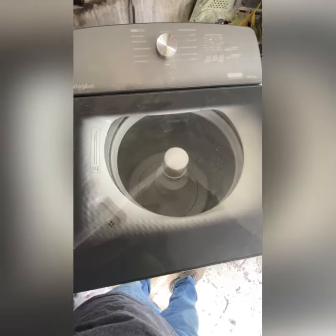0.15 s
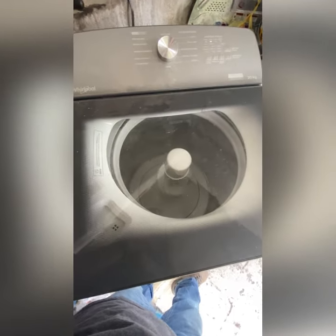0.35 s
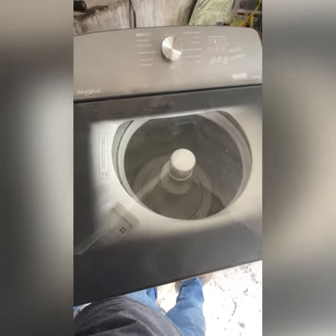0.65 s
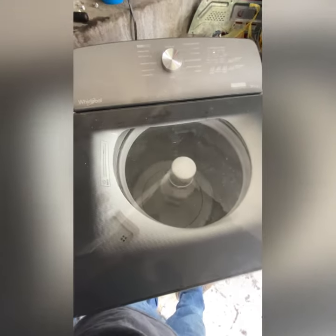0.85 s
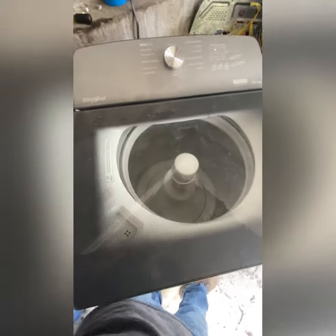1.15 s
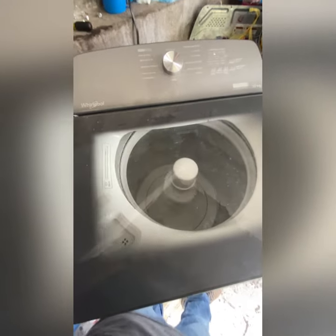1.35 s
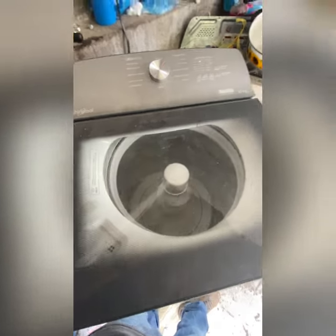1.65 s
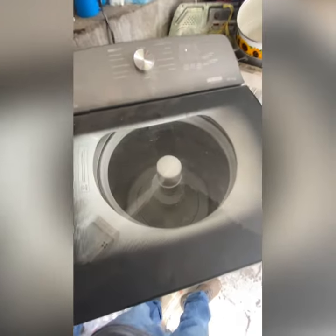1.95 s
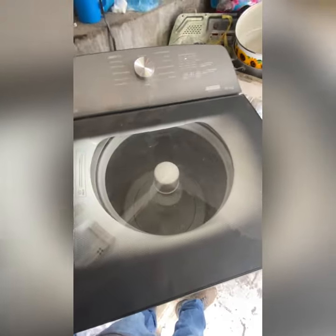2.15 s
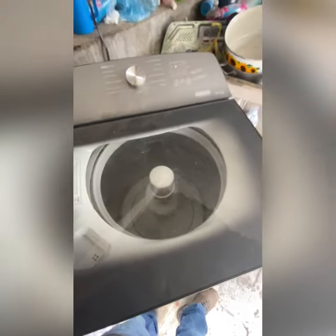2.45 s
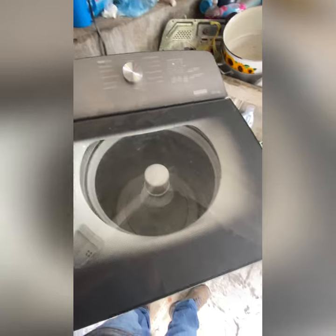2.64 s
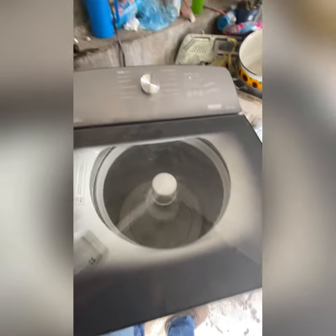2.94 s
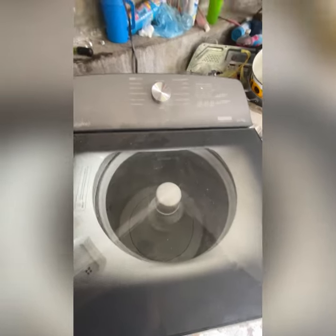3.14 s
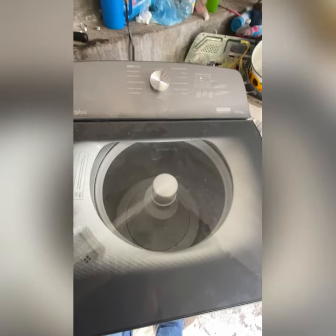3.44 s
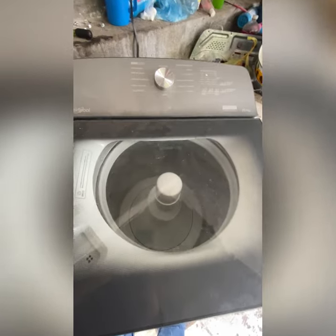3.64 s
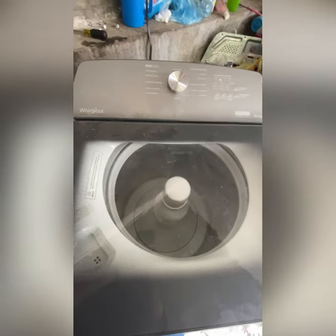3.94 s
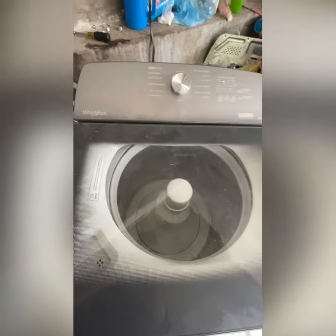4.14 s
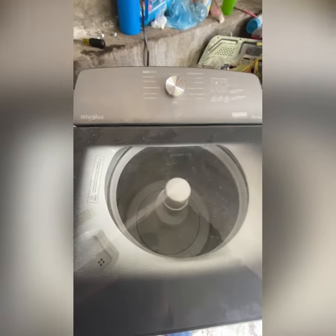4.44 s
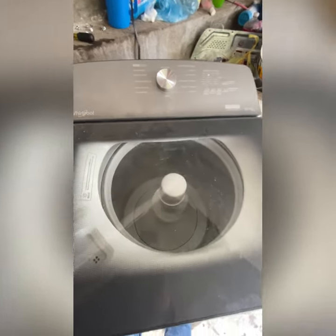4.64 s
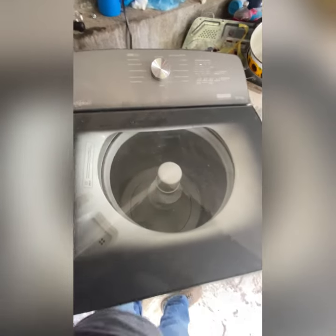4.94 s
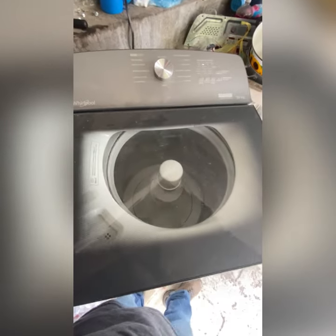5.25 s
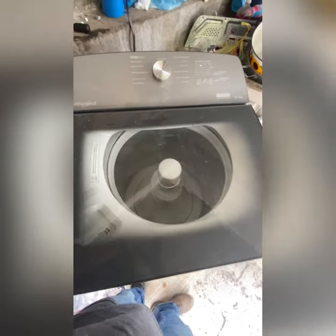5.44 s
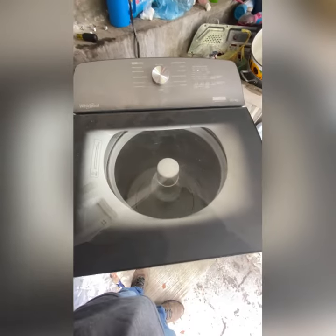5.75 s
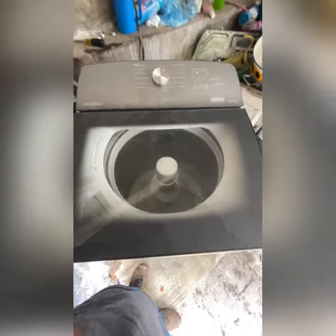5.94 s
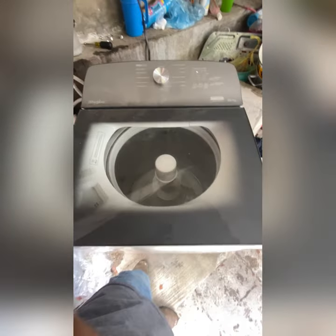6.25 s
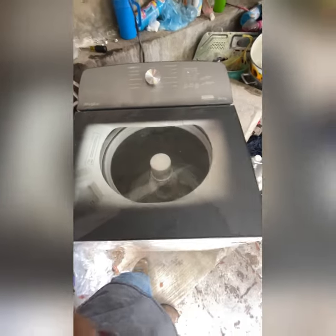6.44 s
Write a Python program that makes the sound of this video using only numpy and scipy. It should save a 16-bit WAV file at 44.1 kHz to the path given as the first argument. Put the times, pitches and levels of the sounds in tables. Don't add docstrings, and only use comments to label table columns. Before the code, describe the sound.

An empty washing machine spins down outdoors. At first motor hum and belt whirr sit over a heavy rumble, with one bright drop tick; then a short rattling thud ends the motor. The low shaking gradually sinks in pitch and level, the panel throbs, and leftover water spits and splashes. Far engines swell faintly. Close stereo pickup, dry open air.

```python
import sys
import numpy as np
from scipy import signal
from scipy.fft import rfft, irfft, next_fast_len
from scipy.io import wavfile

SR = 44100
rng = np.random.default_rng(int(sys.argv[2]) if len(sys.argv) > 2 else 0)


def rack_gain(trim_db):
    fader = np.asarray(trim_db, float)
    return 10 ** (fader / 20)


def wrap_up_sound(samples):
    columns = np.atleast_2d(samples).T
    tamed = np.clip(columns, -1, 1)
    steps = np.round(tamed * 32767).astype(np.int16)
    wavfile.write(sys.argv[1], SR, steps)


N = 290619
T = np.arange(N) / SR
MOTOR_OFF_S = 0.90


def rms_one(x):
    return x / np.sqrt(np.mean(x ** 2) + 1e-20)


def at_hz(points, hz):
    point_hz, value = np.transpose(points)
    return np.interp(np.log(hz + 1), np.log(point_hz + 1), value)


def drift(rate_hz):
    r = np.exp(-2 * np.pi * rate_hz * 64 / SR)
    slow = signal.lfilter([1], [1, -2 * r, r * r], rng.standard_normal(N // 64 + 2002))[2000:]
    return np.interp(np.arange(N) / 64, np.arange(len(slow)), rms_one(slow - slow.mean()))


def sine(hz, level_db):
    turns = np.cumsum(hz + np.zeros(N)) / SR
    return np.sqrt(2) * rack_gain(level_db) * np.sin(2 * np.pi * (turns + rng.random()))


def swell(peak_s, half_s):
    return np.exp(-0.5 * ((T - peak_s) / half_s) ** 2)


def ring(clicks, hz, t60_s):
    r, w = rack_gain(-60 / (t60_s * SR)), 2 * np.pi * hz / SR
    return signal.lfilter([0, np.sin(w)], [1, -2 * r * np.cos(w), r * r], clicks + 1e-18)


def noise(spectrum):
    size = next_fast_len(N)
    colour = rack_gain(at_hz(spectrum, np.arange(size // 2 + 1) * SR / size))
    return rms_one(irfft(rfft(rng.standard_normal((2, size))) * colour, size)[:, :N])


def rumble():
    # freq_hz, level_db_per_hz
    low = [(15, -51), (28, -24), (42, -10), (75, 0.5), (125, -6.5), (190, -17.5), (240, -9), (400, -13.5),
           (470, -20), (560, -19.5), (800, -22)]
    # freq_hz, level_db_per_hz
    air = [(800, -24), (1050, -28), (1500, -31.5), (2250, -33.5), (2480, -33.5), (2700, -36), (3900, -43.5),
           (4700, -45), (6000, -48.5), (6700, -52), (8000, -56.5), (10000, -61), (12000, -65),
           (15000, -76.5), (17000, -120)]
    driven_db, settle_s = 2.5, 1
    level_db = -37 - 0.6 * T + driven_db * np.exp(-T / settle_s)
    return rack_gain(level_db + drift(17.0)) * noise([*low, *air[1:]])


def tub():
    # time_s, turns_per_s
    tub_turns = [(0, 13.12), (6.59, 10.06)]
    # freq_hz, level_db
    cabinet = [(20, -56), (36, -77), (48, -62), (70, -46.5), (105, -56), (135, -52), (160, -67.5),
               (190, -65), (240, -63), (330, -65.5), (420, -49)]
    # freq_hz, width_hz, level_db
    swept = [(31.8, 2.2, -53), (54.24, 1.64, -37), (57.8, 0.79, -38), (60.55, 1.9, -27.5),
             (63.3, 2.2, -37.5), (64.67, 0.75, -29.5), (73.7, 8.4, -42), (78, 2.2, -36.5), (82.1, 2.3, -37),
             (87.14, 3.3, -37.5), (105.3, 9.5, -50.5), (121.8, 3, -52), (130.45, 6.4, -48), (147.3, 5, -51)]
    strong = dict([(3, -1.5), (5, -1), (7, -1), (9, 2.5), (10, -2.5), (11, 3), (12, -1), (13, -5.5)])
    # peak_s, half_s, level_db
    bouts = [
        (1.007, 0.12, -43),
        (1.895, 0.28, -42.5),
        (2.917, 0.34, -40),
        (4.612, 0.35, -48),
        (5.346, 0.3, -46),
        (6.1, 0.27, -45.5),
    ]
    panel_hz, panel_width_hz = 282, 14.3
    knock_turn = 0.13

    speed = np.interp(T, *np.transpose(tub_turns))
    angle = 2 * np.pi * np.cumsum(speed) / SR
    coarse, lines = slice(0, N, 16), 0
    for order in range(2, 32):
        hz = order * speed[coarse]
        if order in strong:
            power = 0
            for mode_hz, width_hz, top_db in swept:
                power = power + rack_gain(2 * top_db) / (1 + (2 * (hz - mode_hz) / width_hz) ** 2) ** 2
            gain = rack_gain(strong[order]) * np.sqrt(power)
        else:
            gain = rack_gain(at_hz(cabinet, hz))
        spread_db = 2.2 if order > 7 or order not in strong else 0.6
        waver = rack_gain(spread_db * drift(1.0)[coarse])
        phase = order * angle[coarse] + 2 * np.pi * rng.random()
        lines = lines + np.sqrt(2) * gain * waver * np.sin(phase)
    shaking = signal.resample_poly(lines, 16, 1, padtype="reflect")[:N]

    knock_angle = angle + 2 * np.pi * (knock_turn + 0.051 * drift(1))
    throb = rack_gain(11.0 * np.cos(knock_angle) + 2.0 * drift(4.3))
    panel = throb * sine(panel_hz + 0.302 * panel_width_hz * drift(1.875), 0)
    bout_gain = sum(rack_gain(level_db) * swell(s, half_s) for s, half_s, level_db in bouts)
    return shaking + bout_gain * rms_one(panel)


def sheet():
    # freq_hz, rms_db, t60_s
    sheet_modes = [(357.4, -50, 0.15), (422, -51.5, 0.099), (543.6, -51.5, 0.07), (707, -59, 0.04)]
    jolts_per_s = 150.0
    out = np.zeros((2, N))
    for hz, level_db, t60_s in sheet_modes:
        struck = rng.random((2, N)) < jolts_per_s / SR
        force = rack_gain(4.1 * np.minimum(rng.exponential(1, (2, N)), 4))
        jolts = struck * force * rng.choice([-1, 1], (2, N))
        out += rack_gain(level_db) * rms_one(ring(ring(jolts, hz, t60_s), hz, 0.28 * t60_s))
    return out * rack_gain(-0.6 * T)


def motor():
    # multiple_of_hum, level_db
    hum_lines = [(1, -44), (2, -41), (3, -42), (3.62, -51), (6.01, -45), (7.02, -61), (9, -66),
                 (14.17, -70), (17.05, -75)]
    # freq_hz, level_db_per_hz
    whirr_colour = [(120, -47), (200, -11), (290, 5.5), (400, -10), (440, -1), (480, -4.5), (600, -6),
                    (800, -8.5), (1100, -23.5), (2100, -27), (2500, -30), (4000, -49), (6000, -56)]
    hum_hz = 121.1
    since_s = T - MOTOR_OFF_S
    easing = np.clip(since_s + 0.09, 0, 1)
    hum = 0
    for k, level_db in hum_lines:
        hum = hum + sine(k * hum_hz, level_db + min(0.3 * k, 1.2) * drift(8) - 9 * k * easing)
    whirr = rack_gain(-41.0 + 0.94 * drift(20)) * noise(whirr_colour)
    return (whirr + hum * [[1], [0.5]]) * rack_gain(-300.0 * np.clip(since_s, 0, 1))


def wet_spray():
    # freq_hz, level_db_per_hz
    spray_colour = [(600, -8), (1300, -0.5), (2000, 4), (2600, 7), (4000, -2.5), (4800, -1), (5200, -0.5),
                    (5800, -3), (7000, -5), (8000, -11.5), (10000, -16), (12000, -20), (15000, -28.5),
                    (17000, -71)]
    return noise(spray_colour) * rack_gain(0.51 * drift(73))


def spits(spray):
    # start_s, level_db, brightness_db
    fine = [(0.0, -52, -5), (.12, -58, 6), (.256, -54.5, 4), (0.322, -49.5, 5.5), (.52, -66, -12),
            (.645, -57.5, -6), (.79, -64, 14), (1.0, -57.5, -4), (1.1, -65, -3), (1.188, -55.5, 7),
            (1.27, -67, 2), (1.55, -58, -4), (1.62, -58.5, -2), (1.806, -56, -2), (2.007, -58, 10),
            (2.268, -49.5, 10), (2.69, -65, -12), (2.97, -66, 9), (3.275, -60, 6), (3.34, -62, 6),
            (3.58, -63, 7), (3.68, -60, 6), (4.488, -55.5, 13), (4.725, -58, 1), (5.27, -73, 16),
            (5.53, -53.5, 3), (5.68, -78, 8), (5.89, -73, 13), (6.283, -70, 12), (2.14, -69, 12)]
    # start_s, level_db, hollow_hz, ring_db, t60_s
    splashes = [(.76, -63, 2440, 23, .2), (2.005, -60.5, 4700, 20, .2), (2.005, -71, 5700, 17, .2),
                (2.008, -67, 2440, 24, 0.45), (2.274, -55.5, 5600, 22, 0.21), (3.29, -63, 6030, 9, 0.48),
                (3.77, -59.5, 1590, 16, .26), (4.08, -69, 5470, 2, .4), (4.49, -52, 1470, 18, 0.21),
                (4.495, -62, 1780, 25, 0.17), (4.515, -71, 5770, 12, .24), (4.762, -57, 6150, -5, 0.26),
                (5.558, -51.5, 4550, 15, 0.17), (5.585, -75, 4900, 17, .13), (5.83, -61.5, 5470, 0, 0.48),
                (6.22, -66.5, 5500, 7, 0.51)]
    mist_hz, mist_t60_s, bright_shortens = 9700, 0.39, 0.46
    rise_ref_s, weak_slows, ring_quickens = 0.014, 0.55, 0.45
    mist = []
    for s, level_db, ring_db in fine:
        mist.append((s, level_db, mist_hz, ring_db, mist_t60_s * rack_gain(-bright_shortens * ring_db)))
    out = np.zeros((2, N))
    for s, level_db, hz, ring_db, t60_s in [*mist, *splashes]:
        rise_s = rise_ref_s * rack_gain(-weak_slows * (level_db + 66) - ring_quickens * max(ring_db - 8, 0))
        since_s = np.arange(int((rise_s + t60_s) * SR)) / SR
        decay_db = 60 * np.maximum(since_s - rise_s, 0) / t60_s
        shape = np.minimum(since_s / rise_s, 1) * rack_gain(level_db - decay_db)
        span = slice(int(s * SR), min(int(s * SR) + len(since_s), N))
        q = max(2, rack_gain(1.2 * ring_db))
        hollow = signal.lfilter(*signal.iirpeak(hz, q, fs=SR), spray[:, span])
        splash = rack_gain(-0.3 * ring_db) * spray[:, span] + rack_gain(ring_db) * hollow
        out[:, span] += shape[:span.stop - span.start] * splash
    return out


def engines():
    # start_s, stop_s, idle_s, idle_to_revs_s (negative: dropping), level_db
    spells = [
        (-.15, 1.45, .4, 2.7, -30),
        (1.25, 1.95, .4, 2.7, -34),
        (3.38, 4.08, 3.9, .5, -31.5),
        (3.92, 4.38, 3.9, .5, -32.5),
        (5.2, 5.9, 6.3, -1.2, -34),
        (5.72, 6.75, 6.3, -1.2, -33.5),
    ]
    idle_hz, idle_sag_hz_per_s, rev_hz, swell_power = 51.95, 0.2, 16.5, 0.84
    second_s, second_hz, second_db = 6.05, 94.7, -40
    out = np.zeros(N)
    for start_s, stop_s, idle_s, swing_s, level_db in spells:
        revs = 0.5 - 0.5 * np.cos(np.pi * np.clip((T - idle_s) / swing_s, 0, 1))
        hz = idle_hz - idle_sag_hz_per_s * idle_s + rev_hz * revs
        part = np.clip((T - start_s) / (stop_s - start_s), 0, 1)
        heard = np.abs(np.sin(np.pi * part)) ** swell_power
        out += heard * sine(hz + 0.35 * drift(4.3), level_db + 1.2 * drift(3))
    second = sine(second_hz + 1.1 * drift(3.8), second_db + 0.73 * drift(1.5))
    return out + np.clip((T - second_s) / 0.16, 0, 1) * second


def drops():
    # start_s, peak_db, pitch_hz
    ticks = [
        (.309, -28.5, 4840),
        (4.764, -48, 2200),
        (5.045, -48, 2000),
        (6.29, -58, 7910),
    ]
    out = np.zeros((2, N))
    for s, peak_db, hz in ticks:
        click = np.zeros(N)
        click[int(s * SR)] = rack_gain(peak_db)
        out[0] += ring(click, hz, 0.0012)
    return out


def clunk():
    # freq_hz, level_db_per_hz
    thud_colour = [(200, -32), (330, -5), (450, 6), (600, 0.5), (800, -6.5), (1000, -8.5), (1500, -18),
                   (2100, -20), (3200, -25), (5500, -32.5), (9000, -54)]
    # freq_hz, level_db, t60_s
    clutch = [(1240, -68, 0.043), (1410, -48.5, .06), (1570, -52, .12), (1790, -50, 0.051),
              (2830, -48, 0.04)]
    since_s = T - MOTOR_OFF_S
    fall_db = 280.0 * np.clip(since_s - 0.014, 0, 1)
    thud = np.clip((since_s + 0.017) / 0.0066, 0, 1) * rack_gain(-fall_db + 2.06 * drift(80))
    rattle = thud * rng.standard_normal((2, N))
    housing = sum(rack_gain(level_db - 24.0) * ring(rattle, hz, t60_s) for hz, level_db, t60_s in clutch)
    return rack_gain(-34.5) * thud * noise(thud_colour) + housing


def gush(spray):
    # freq_hz, level_over_spray_db
    gaps = [(2720, 3), (4725, 6), (4930, 9), (5593, 7), (5680, 6)]
    start_s, rise_s, hold_s, end_s = 2.292, 0.053, 0.055, 2.84
    level_db, rise_db, fall_db_per_s = -40.5, 17, 68.5
    bright_db, dulls_db_per_s, gap_width_hz = 10, 23, 25
    high = signal.sosfilt(signal.butter(2, 4000, "high", fs=SR, output="sos"), spray)
    jets = 0
    for hz, over_db in gaps:
        jets = jets + rack_gain(over_db) * signal.lfilter(*signal.iirpeak(hz, hz / gap_width_hz, fs=SR), spray)
    falling_s = np.maximum(T - start_s - rise_s - hold_s, 0)
    missing_db = rise_db * np.clip(1 - (T - start_s) / rise_s, 0, 1)
    gain = rack_gain(level_db - missing_db - fall_db_per_s * falling_s)
    gate = (T > start_s) * np.clip((end_s - T) / 0.18, 0, 1)
    bright = rack_gain(bright_db - dulls_db_per_s * falling_s)
    return gate * gain * (spray + (bright - 1) * high + jets)


def bearing():
    return swell(4.1, 0.3) * sine(2460 + 12 * drift(15), -71 + 4.0 * drift(12))


def insect():
    throbs_per_s, throb_db, beat_s = 10, 1, 5.4
    pulse_db = throb_db * np.cos(2 * np.pi * throbs_per_s * (T - beat_s))
    return swell(5.06, 0.11) * sine(6700 + 22 * drift(13.3), -67.5 + pulse_db + 4.1 * drift(30))


def ports(sound):
    # freq_hz, share_0_to_1
    shared_points = [(60, 1.0), (200, .985), (300, .94), (420, .8), (540, .55), (650, .16), (900, .3),
                     (1650, .45), (2000, .3), (3000, .45), (4200, .45), (5500, .75), (9500, .78),
                     (10000, .97)]
    # freq_hz, lead_rad
    lead = [(40, 0), (300, -.15), (550, .1), (850, 2.4), (1500, .4), (2800, 2.4), (3900, 1.1), (4500, 2.0),
            (5500, .6), (7400, 3.1), (9700, 6.2), (11000, 6.4), (12500, 8.5)]
    # freq_hz, left_minus_right_db
    left_db = [(60, .1), (130, 0), (220, -1.4), (500, -.6), (800, .5), (1400, 2.5), (2100, -2), (3400, .5),
               (4400, -1), (8000, -1), (11000, 0)]
    size = next_fast_len(N + SR // 4)
    hz = np.arange(size // 2 + 1) * SR / size
    margin = SR // 10
    padded = np.pad(sound, ((0, 0), (margin, margin)), "reflect", reflect_type="odd")
    length = N + 2 * margin
    direct, scattered = rfft(padded * signal.windows.tukey(length, 2 * margin / length), size)
    shared = np.clip(at_hz(shared_points, hz), 0, 1)
    both, apart = np.sqrt(1 + shared) * direct, np.sqrt(1 - shared) * scattered
    skew = rack_gain(at_hz(left_db, hz) / 2) * np.exp(0.5j * at_hz(lead, hz))
    pair = np.array([(both + apart) * skew, (both - apart) / skew]) / np.sqrt(2)
    return irfft(pair, size)[:, margin:margin + N]


def scene():
    tones = (tub() + engines() + bearing() + insect()) * [[1], [0.3]]
    spray = wet_spray()
    water = spits(spray) + drops() + gush(spray)
    return ports(rumble() + tones + sheet() + motor() + clunk() + water)


def band_limit(x):
    return signal.sosfilt(signal.butter(12, 15700, fs=SR, output="sos"), x)


def record(dry):
    i = np.arange(N)
    ends = np.clip(np.minimum(i + 30, N - 1 - i) / 150, 0, 1)
    return band_limit(dry * np.sin(np.pi / 2 * ends) ** 2)


dry = scene()
out = record(dry)
wrap_up_sound(out)
```